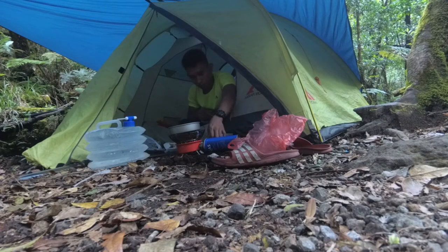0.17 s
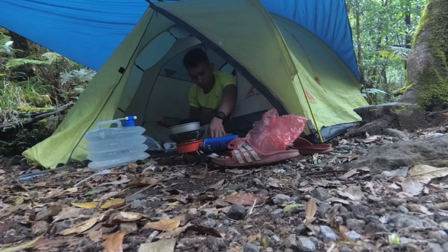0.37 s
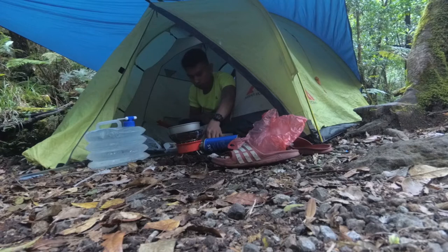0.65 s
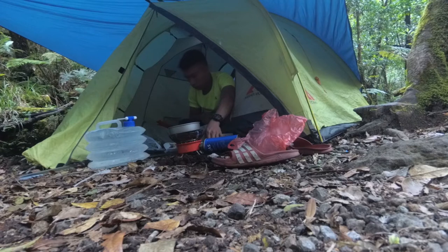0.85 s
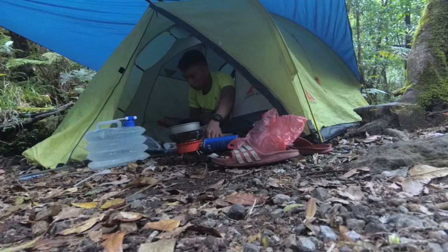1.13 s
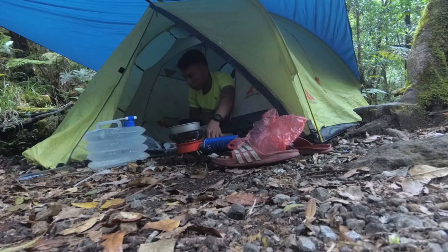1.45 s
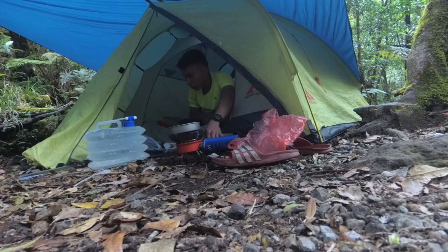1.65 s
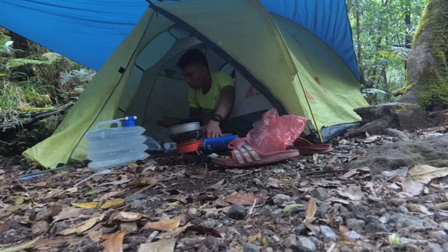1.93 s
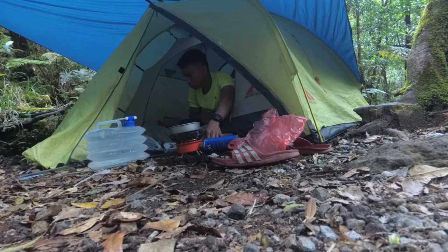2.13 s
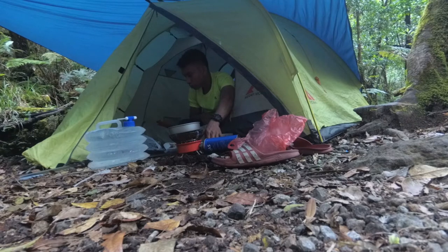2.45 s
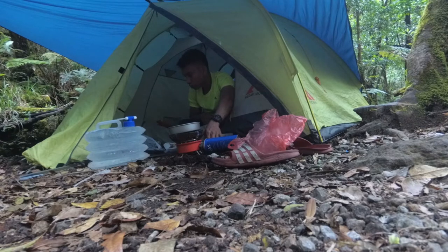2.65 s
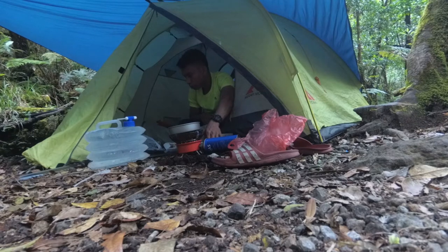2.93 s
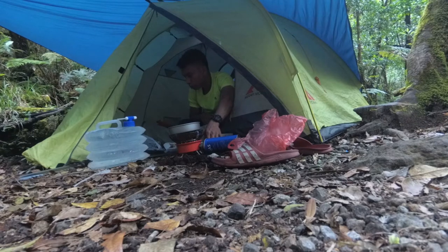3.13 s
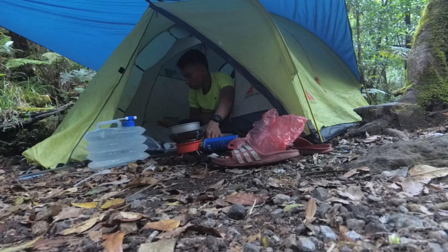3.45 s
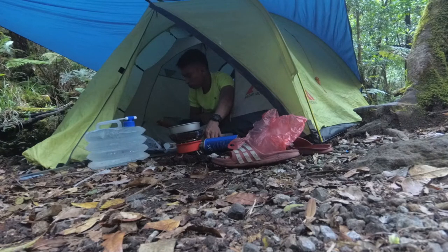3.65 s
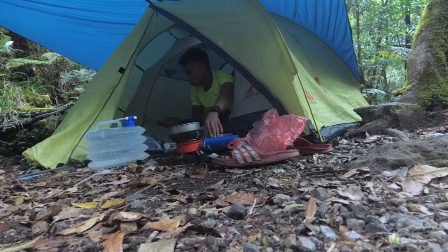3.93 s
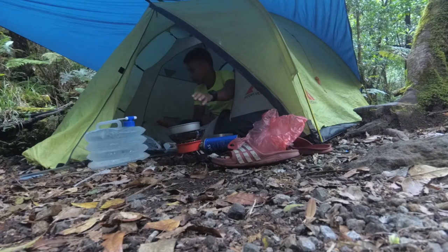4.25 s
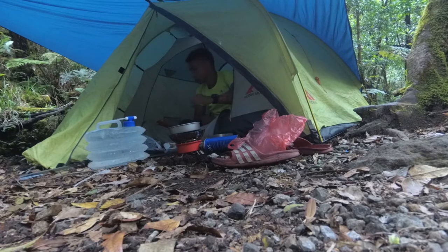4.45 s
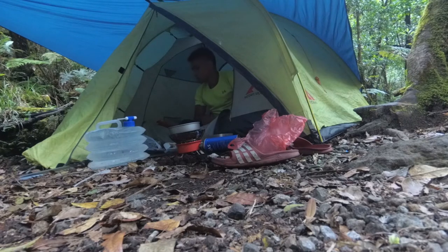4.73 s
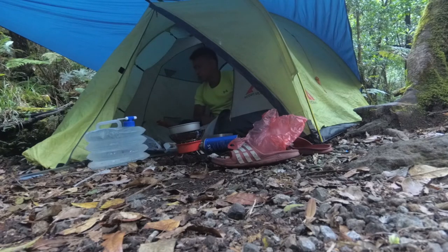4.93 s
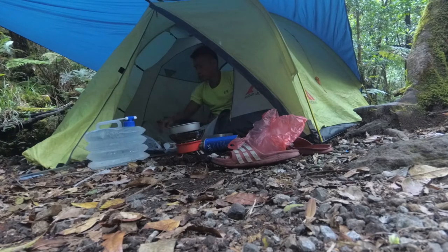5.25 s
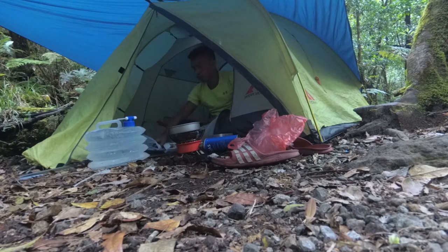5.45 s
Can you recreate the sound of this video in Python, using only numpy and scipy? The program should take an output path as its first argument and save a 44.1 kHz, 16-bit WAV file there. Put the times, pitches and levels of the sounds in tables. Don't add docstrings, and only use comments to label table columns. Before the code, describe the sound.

At a forest campsite, a hollow metal pot is set on a small burner and rocks, then a hard lid blow clangs and rattles, overloading the small microphone about two metres away. Lighter stand knocks and handle taps follow, then a second clattering set-down, a latch-like snap and a metal cup put down. Steady low rumble and faint hiss lie underneath.

```python
import sys
import numpy as np
from scipy import signal
from scipy.fft import rfft, irfft
from scipy.io import wavfile

SR = 44100
rng = np.random.default_rng(int(sys.argv[2]) if len(sys.argv) > 2 else 0)


def decibels_to_gain(level_db):
    exponent = np.asarray(level_db, float) / 20
    return 10 ** exponent


def dump_mix(stems):
    frames = np.atleast_2d(stems).T
    limited = np.clip(frames, -1, 1)
    pcm = np.round(limited * 32767).astype(np.int16)
    wavfile.write(sys.argv[1], SR, pcm)


N = 246519


def in_samples(s):
    return int(round(s * SR))


def rms_one(x):
    return x / np.sqrt(np.mean(x ** 2) + 1e-20)


def peak_one(x):
    return x / np.max(np.abs(x))


def dying(t60, seconds):
    return decibels_to_gain(-60 * np.arange(in_samples(seconds)) / SR / max(t60, 1e-3))


def add(out, s, piece):
    part = out[in_samples(s):in_samples(s) + len(piece)]
    part += piece[:len(part)]


def ring(force, hz, t60):
    radius = decibels_to_gain(-60 / (max(t60, 1e-3) * SR))
    angle = 2 * np.pi * hz / SR
    return signal.lfilter([0, np.sin(angle)], [1, -2 * radius * np.cos(angle), radius ** 2], force)


def coloured(x, spectrum, tilt_db=0):
    hz = np.maximum(np.arange(len(x) // 2 + 1) * SR / len(x), 1)
    points_hz, points_db = np.array(spectrum).T
    shape_db = np.interp(np.log(hz), np.log(points_hz), points_db)
    return irfft(rfft(x) * decibels_to_gain(shape_db + tilt_db * np.log2(hz / 5000)), len(x))


def knocks():
    # t/s, peak level/dB, thump f/Hz, thump t60/s
    single_knocks = [(0.578, 6, 630, 0.013), (0.604, -6, 701, 0.015), (0.677, -2.5, 654, 0.027),
                     (0.794, -30.5, 619, 0.042), (1.075, -20, 544, 0.025), (1.095, -21, 553, 0.024),
                     (1.112, -27, 550, .03), (1.18, -22, 543, 0.041), (1.346, -14, 626, 0.015),
                     (1.42, -24.5, 554, 0.038), (1.546, -19, 580, 0.016), (1.629, -13, 584, 0.019),
                     (1.967, -23, 570, 0.014), (2.039, -25, 448, 0.068), (2.593, -28.5, 595, 0.019),
                     (3.193, -29, 596, 0.025), (3.256, -10.5, 557, 0.021), (3.285, -14, 600, 0.017),
                     (3.317, -21, 530, 0.021), (3.332, -24, 590, 0.026), (3.351, -32, 557, 0.035),
                     (3.434, -13.5, 608, 0.023), (4.116, -29.5, 339, 0.073), (4.3278, -21.5, 580, 0.0081),
                     (4.347, -11.5, 407, 0.011), (4.363, -17.5, 430, 0.023), (4.68, -28.5, 420, 0.032),
                     (4.691, -20, 349, 0.03)]
    # t/s, peak
    # level/dB, f/Hz, t60/s
    second_voices = [
        (.5778, -11, 558, 0.077),
        (.614, -19.5, 715, 0.045),
        (.686, -15, 650, 0.068),
        (1.3468, -20, 440, 0.017),
        (3.2568, -13.5, 730, 0.026),
        (3.3185, -30, 686, 0.034),
        (4.346, -17, 556, 0.051),
        (4.3465, -15.5, 339, 0.018),
        (1.085, -25, 570, 0.017),
        (4.354, -22, 433, 0.016),
    ]
    # t/s, peak level/dB, side mode f/Hz
    set_downs = [
        (0.4097, 0, 624),
        (2.8207, 0, 462),
    ]
    # level re peak/dB, f/Hz, t60/s
    landing = [
        (0.5, 536.6, 0.036),
        (-11.5, 270, 0.013),
    ]
    rows = single_knocks + second_voices
    for s, peak_db, side_hz in set_downs:
        rows = rows + [(s, peak_db + db, hz, t60) for db, hz, t60 in landing]
        rows = rows + [(s, peak_db - 12.5, side_hz, 0.048)]
    return rows


def pot():
    # f/Hz, level/dB, t60/s
    upper_wall = [(1000, 0, 0.07), (1230, 16, 0.025), (1370, 28, 0.04), (1600, 5, .035), (1960, 3, .03),
                  (2220, 0, .03)]
    shoulder_hz, shoulder_db, shoulder_t60 = 719, -14, 0.063
    thud_hz, thud_db, thud_t60 = 337, -19, 0.013
    linger_db, linger_t60 = -30.5, 0.18
    upper_db = -14.5
    out = np.zeros(N)
    t = np.arange(in_samples(.25)) / SR
    swell = 1 - np.exp(-(t / 0.0021) ** 1.5)
    push = -swell * dying(0.002, .25)
    shoulder = -peak_one(swell * dying(shoulder_t60, .25) * np.sin(2 * np.pi * shoulder_hz * t))
    thud = decibels_to_gain(thud_db) * peak_one(ring(push, thud_hz, thud_t60))
    for s, peak_db, hz, t60 in knocks():
        fade = dying(t60, .25) + decibels_to_gain(linger_db) * dying(linger_t60, .25)
        thump = -peak_one(swell * fade * np.sin(2 * np.pi * hz * t))
        uneven_db = 2.5 * rng.standard_normal(len(upper_wall))
        upper = peak_one(sum(decibels_to_gain(db + e) * ring(push, f, d)
                             for (f, db, d), e in zip(upper_wall, uneven_db)))
        knock = thump + decibels_to_gain(shoulder_db) * shoulder + decibels_to_gain(upper_db) * upper + thud
        add(out, s - .0001, decibels_to_gain(peak_db) * knock)
    return out


def rocking():
    # t/s, peak level/dB, favoured f/Hz
    touches = [(.419, -21, 690), (.433, -12, 537), (.446, -11, 547), (.452, -11, 675), (.462, -7.5, 690),
               (.471, -10.5, 720), (.478, -14, 593), (.489, -18, 600), (.498, -28, 620), (.511, -25, 570),
               (.529, -24, 724), (0.535, -9, 740), (.547, -18, 690), (.555, -23, 690), (.620, -23, 610),
               (.639, -26, 590), (.658, -33, 620), (.720, -30, 650), (2.828, -19, 720), (2.845, -13.5, 545),
               (2.859, -12.5, 660), (2.870, -18, 716), (2.882, -7.5, 587), (2.893, -20, 694),
               (2.900, -17, 640), (2.910, -22, 640), (2.924, -22, 630), (2.931, -25, 560),
               (2.943, -20, 640), (2.9551, -10.5, 670), (2.972, -31, 710), (2.985, -26, 580),
               (3.163, -31, 634), (3.181, -31, 640), (3.206, -30, 640), (3.27, -24, 590), (3.340, -34, 647)]
    # f/Hz, level/dB, t60/s
    wall = [(554, 3.5, 0.05), (634, 4, 0.049), (711.5, 1.5, 0.072)]
    favour_hz = 43
    out = np.zeros(N)
    t = np.arange(in_samples(.25)) / SR
    swell = 1 - np.exp(-t / 0.0019)
    for s, peak_db, favoured_hz in touches:
        rings = sum(decibels_to_gain(db - ((hz - favoured_hz) / favour_hz) ** 2) * dying(t60, .25)
                    * np.sin(2 * np.pi * hz * t) for hz, db, t60 in wall)
        add(out, s, -decibels_to_gain(peak_db) * peak_one(swell * rings))
    return out


def metal(hits, modes, crack_colour):
    out, size = np.zeros(N), in_samples(.3)
    swell = 1 - np.exp(-np.arange(size) / SR / 0.0014)
    for s, peak_db, t60, ring_db, tilt_db in hits:
        crack_noise, chatter_noise = rng.standard_normal((2, size))
        uneven_db = 2.5 * rng.standard_normal(len(modes))
        crack = rms_one(coloured(crack_noise, crack_colour, tilt_db)) * swell * dying(t60, .3)
        chatter = chatter_noise * dying(t60 * 0.5, .3)
        rings = sum(decibels_to_gain(db + e + tilt_db * np.log2(hz / 5000)) * peak_one(ring(chatter, hz, d))
                    for (hz, db, d), e in zip(modes, uneven_db))
        add(out, s - .0003, decibels_to_gain(peak_db) * (decibels_to_gain(-3.5) * crack + decibels_to_gain(ring_db - 11.5) * rings))
    return out


def lid():
    # t/s, peak level/dB, crack t60/s, ring level/dB, tilt/(dB/octave)
    hits = [
        (.5775, 3, 0.037, -4.5, -3.5),
        (.5822, 4, 0.036, -3, 3),
        (.604, -26, 0.033, -5, 7),
        (.611, -25.5, 0.37, -6, 3),
    ]
    # t/s, peak level/dB, crack t60/s, ring level/dB, tilt/(dB/octave)
    rattle = [
        (.590, -16, .02, 0, 4),
        (.597, -25, .02, -4, 0),
        (.619, -29, 0.023, 5, 0),
        (.631, -32, .025, 2, 0),
        (.648, -33, .03, 4, 0),
    ]
    # f/Hz, level/dB, t60/s
    modes = [(1710, -22, 0.06), (1391, -18, 0.11), (2930, -15, 0.09), (3300, -11, 0.07), (3510, -10, 0.046),
             (4076, 0, 0.056), (4298, -4, 0.11), (4490, -12, .1), (5000, -22, .08), (5750, -7, 0.072),
             (6172, -1.5, 0.058), (7800, -14, .045), (7960, -17, 0.076), (9050, -2.5, 0.058),
             (9200, -15, 0.059), (9770, -11, .065), (10700, -9, 0.035), (11100, -18, 0.13),
             (13520, -28, 0.072), (14900, -19, .045), (14700, -16, .05)]
    # f/Hz, density/(dB/Hz)
    crack_colour = [(590, -4), (1150, 10.5), (3200, -3), (4190, 4.5), (5400, -8), (6260, -8), (8540, -10),
                    (9250, -14), (9690, -8.5), (15500, -9.5)]
    return metal(hits, modes, crack_colour) + metal(rattle, modes, crack_colour)


def rim():
    # t/s, peak level/dB, crack t60/s, ring level/dB, tilt/(dB/octave)
    hits = [
        (.6775, -11.5, 0.057, -2, -1),
        (.682, -11, 0.039, -1.5, 2),
    ]
    # f/Hz, level/dB, t60/s
    modes = [(1154, 4, 0.044), (1620, -11, 0.03), (2530, -14, .04), (3510, -8, 0.077), (4600, -8, 0.03),
             (6340, -6, .03), (7640, -11, .05), (9040, -12, .035), (11260, -1, .04), (14800, 1, .03)]
    # f/Hz, density/(dB/Hz)
    crack_colour = [(710, -37), (1200, -2.5), (3080, -14), (3540, -4.5), (4070, -17), (4570, -10.5),
                    (7980, -22), (9080, -13), (15500, -12)]
    return metal(hits, modes, crack_colour)


def burner():
    # t/s, peak level/dB, crack t60/s, ring level/dB, tilt/(dB/octave)
    hits = [
        (.4098, -13, 0.079, -7, 0.15),
        (.4153, -11.5, 0.041, 3, 1),
        (2.8218, -22, 0.021, 14.5, -0.91),
        (2.8265, -10, 0.05, -3.5, -0.1),
        (2.833, -22, 0.059, -7, 1),
    ]
    # f/Hz, level/dB, t60/s
    modes = [(1383, 6, 0.029), (2020, -17, 0.13), (2750, -23, .12), (3850, -6, 0.066), (4830, -5.5, 0.037),
             (6480, -9, 0.056), (7410, -8, 0.044), (10060, -7.5, 0.028), (11900, -6, 0.031),
             (14400, -3.5, .03)]
    # f/Hz, density/(dB/Hz)
    crack_colour = [(1100, 5.5), (1390, 5), (2010, 3), (2330, -7.5), (4760, -4), (5350, -14), (6600, 0.5),
                    (8330, -15), (10800, -2), (15500, -16)]
    return metal(hits, modes, crack_colour)


def prongs():
    # t/s, peak level/dB, crack t60/s, ring level/dB, tilt/(dB/octave)
    rebounds = [
        (.4505, -20.5, 0.073, -1.5, -4.5),
        (.4548, -23, .04, -9, 4),
        (.468, -20.5, 0.11, -12, -6),
        (2.8592, -18, 0.042, 2.5, -5),
        (2.8636, -16, 0.029, -5, 3),
        (2.872, -19.5, 0.056, 1, -5.5),
        (2.885, -32, 0.25, -9, -4),
    ]
    # f/Hz, level/dB, t60/s
    prong_modes = [(1830, -7, 0.037), (2030, -10, 0.08), (2710, -24, .14), (3350, -11, .05),
                   (4500, 4.5, 0.049), (4750, -3, .045), (7040, -2, .04), (11500, -6, .03),
                   (14500, -2, .03)]
    # t/s, peak level/dB, crack t60/s, ring level/dB, tilt/(dB/octave)
    tine_hits = [
        (.424, -34, 0.026, 13.5, -2),
        (.452, -32.5, .02, 16, -3.5),
        (2.832, -31.5, 0.015, 12.5, -5),
        (2.866, -16, 0.016, 15, 9),
        (2.958, -35, 0.013, 13, 2),
    ]
    # f/Hz, level/dB, t60/s
    tine_modes = [(2035, -1.5, 0.13), (2526, -11, 0.15), (3078, -17, 0.1)]
    # t/s, peak level/dB, crack t60/s, ring level/dB, tilt/(dB/octave)
    grit_hits = [
        (.424, -29, .04, -2, -2),
        (.434, -29, .04, -4, -8),
        (.462, -27, .04, -2, -2),
        (.478, -31, .04, -2, -5),
        (.490, -34, .05, -2, -2),
        (2.843, -32, .04, 1, -6),
        (2.878, -28, .04, 0, -1),
        (2.895, -34, .05, -2, -2),
        (2.9565, -22.5, 0.021, 3, -2),
    ]
    # f/Hz, level/dB, t60/s
    grit_modes = [(985, -8, .03), (1090, -1, .04), (1380, 2, .06), (1800, -5, .04), (3304, -3, .06),
                  (3840, -6, .05), (4415, -8, .06), (5100, -7, .05)]
    # f/Hz, density/(dB/Hz)
    crack_colour = [(710, -28), (1200, -2), (2030, -15), (2360, -17), (2510, -6), (3980, -5), (4530, -18),
                    (5670, -9), (7170, -13), (15500, -7)]
    pairs = [(rebounds, prong_modes), (tine_hits, tine_modes), (grit_hits, grit_modes)]
    return sum(metal(hits, modes, crack_colour) for hits, modes in pairs)


def stand():
    # t/s, peak level/dB, crack t60/s, ring level/dB, tilt/(dB/octave)
    hits = [(.536, -20.5, 0.081, -6, -5.5), (1.077, -29, 0.077, 1, -5), (1.090, -29, 0.03, 4, -3),
            (1.969, -32.5, 0.029, 3.5, -1.5), (2.9565, -15, 0.032, -8, -4), (2.965, -27, 0.043, -7, 2),
            (3.2566, -16, 0.054, 8, -2.5), (3.2612, -14.5, 0.029, -5, 3), (3.285, -14, 0.019, 2.5, 1),
            (3.2897, -16, 0.033, 0, 4.5), (3.318, -26, 0.04, -8, -9), (3.333, -29, 0.029, -13, -3.5)]
    # f/Hz, level/dB, t60/s
    modes = [(990, -35, 0.027), (1319, 0, 0.033), (1620, -19, 0.018), (2100, -22, .035), (2450, -24, 0.028),
             (3400, -18, 0.04), (3870, -12, 0.03), (7500, -7.5, 0.016), (10300, -10, .02)]
    # t/s, peak level/dB, crack t60/s, ring level/dB, tilt/(dB/octave)
    foot_hits = [
        (1.0755, -34, .02, 2, -0.5),
        (1.084, -31, .025, 4, -3),
        (1.096, -36, .02, 3, -1.5),
        (1.966, -39, 0.018, 3, -4),
        (3.291, -31, 0.023, 6, -1),
        (3.3205, -37, .03, 4, -4),
        (3.332, -33, .025, 3, 1),
    ]
    # f/Hz, level/dB, t60/s
    foot_modes = [(860, 4, .025), (1180, -14, 0.027), (1320, 8, .035), (1490, 3, .03), (1760, -6, .035),
                  (2600, -13, .03), (3150, -2, .03)]
    # f/Hz, density/(dB/Hz)
    crack_colour = [(590, -32), (1150, 1), (1290, -12), (2390, -14), (4760, -11.5), (5460, -22),
                    (8340, -25), (10300, -22.5), (14100, -34), (15500, -30)]
    return metal(hits, modes, crack_colour) + metal(foot_hits, foot_modes, crack_colour)


def handle():
    # t/s, peak level/dB, crack t60/s, ring level/dB, tilt/(dB/octave)
    hits = [
        (1.3465, -10.5, 0.023, -5, 0.5),
        (1.351, -7, 0.03, -1.5, 0),
        (1.365, -35, 0.12, -6, 10),
        (1.404, -25.5, 0.046, -4, 2),
        (1.546, -19.5, 0.046, -2, 1),
        (1.551, -23, 0.057, -17, -3.5),
        (1.800, -35, .03, -3, 11.5),
    ]
    # f/Hz, level/dB, t60/s
    modes = [(1380, -3, 0.043), (2200, -12, 0.054), (3550, -8, 0.026), (3820, -9, 0.02),
             (4770, -3.5, 0.029), (6320, -2.5, 0.028), (7870, -3, 0.034), (10180, -1, 0.023),
             (10300, -4, .018), (12000, -25.5, .02), (14000, -12, .02)]
    # t/s, peak level/dB, crack t60/s, ring level/dB, tilt/(dB/octave)
    latch_hits = [
        (3.4332, -15, 0.023, 2.5, 2),
        (3.438, -13, 0.042, 0, 2.5),
    ]
    # f/Hz, level/dB, t60/s
    latch_modes = [(1456, 2.5, 0.023), (3860, 0.5, 0.031), (4830, -9, .035), (6580, -1, 0.03),
                   (7450, -1.5, .03), (10340, 1, 0.023), (12200, -8, .025)]
    # f/Hz, density/(dB/Hz)
    crack_colour = [(740, -49), (1250, -8.5), (3090, -4), (3820, -0.5), (5460, -7), (7730, -5.5),
                    (9450, -13.5), (10300, -9.5), (14600, -8), (15500, -9.5)]
    return metal(hits, modes, crack_colour) + metal(latch_hits, latch_modes, crack_colour)


def cup():
    # t/s, peak level/dB, crack t60/s, ring level/dB, tilt/(dB/octave)
    hits = [
        (4.347, -16, 0.073, -1.5, -1.3),
        (4.352, -14, 0.047, -1.5, 1.4),
        (4.692, -26, 0.04, -2.3, -0.97),
    ]
    # f/Hz, level/dB, t60/s
    modes = [(1349, 0, 0.11), (2535, -8, 0.09), (2604, -7, 0.11), (3040, 2, 0.059), (3290, -5, 0.1),
             (3512, -10, 0.07), (3900, -18, 0.12), (4410, -6, 0.091), (5040, -9, 0.12), (6370, -6, 0.07),
             (7420, -13, 0.17), (8000, -11, 0.1)]
    # f/Hz, density/(dB/Hz)
    crack_colour = [(590, -12), (1000, -11.5), (1360, -1), (2340, -16), (2590, -9), (2810, -10), (3410, -3),
                    (5780, -17), (9910, -16), (15500, -26)]
    return metal(hits, modes, crack_colour)


def pings():
    # t/s, peak level/dB, f/Hz, t60/s
    partials = [(.420, -30, 2030, .09), (.455, -31, 2030, .1), (.412, -25, 3080, .06),
                (.454, -29, 1391, .08), (.580, -12, 4090, 0.12), (.582, -15, 4298, 0.09),
                (.584, -16, 6172, .06), (.583, -18, 9040, .05), (0.582, -11, 985, .04),
                (1.352, -25, 2207, .05), (1.551, -33, 2880, .05), (2.828, -25, 4830, .045),
                (2.832, -22, 2035, 0.12), (2.823, -32, 3850, .08), (2.866, -28.5, 2526, .17),
                (2.874, -28, 4500, .04), (2.957, -29, 3870, .03), (2.957, -24, 985, .03),
                (2.962, -32, 3400, .04), (3.256, -23, 4830, .05), (3.262, -31, 2160, .04),
                (3.292, -28, 3080, .06), (3.437, -27, 3860, 0.044)]
    out = np.zeros(N)
    t = np.arange(in_samples(.25)) / SR
    swell = 1 - np.exp(-t / .002)
    for s, peak_db, hz, t60 in partials:
        add(out, s, decibels_to_gain(peak_db) * swell * dying(t60, .25) * np.sin(2 * np.pi * hz * t))
    return out


def surroundings(x):
    echo_db, echo_t60, delay_s = -15.5, .14, .008
    tail = rng.standard_normal(in_samples(.4)) * dying(echo_t60, .4)
    tail = signal.sosfilt(signal.butter(2, [1500, 6600], "band", fs=SR, output="sos"), tail)
    tail = tail / np.sqrt(np.sum(tail ** 2))
    tail = np.concatenate([np.zeros(in_samples(delay_s)), tail])
    return decibels_to_gain(echo_db) * signal.fftconvolve(x, tail)[:N]


def forest():
    # f/Hz, density/(dB/Hz)
    forest_colour = [(15, -64), (25, -34), (96, -16), (119, -9), (169, -3.5), (216, -2.5), (253, -2),
                     (360, -6.5), (584, -11), (633, -11.5), (785, -15.5), (1420, -20), (13600, -27),
                     (15600, -22)]
    stir_s, stir_db, stir_width_s = 0.64, 1.4, 0.19
    t = np.arange(N) / SR
    level_db = -36 + stir_db * np.exp(-((t - stir_s) / stir_width_s) ** 2)
    hiss = rms_one(coloured(rng.standard_normal(N), forest_colour))
    hiss = signal.sosfilt(signal.cheby2(14, 45, 15550, fs=SR, output="sos"), hiss)
    return decibels_to_gain(level_db) * hiss


def scene():
    cookware = pot() + rocking() + pings()
    cookware += lid() + rim() + burner() + prongs() + stand() + handle() + cup()
    cookware = signal.sosfilt(signal.butter(2, 210, "high", fs=SR, output="sos"), cookware)
    return (cookware + surroundings(cookware) + forest())[None]


def top_cut(x):
    return signal.sosfilt(signal.butter(12, 15770, fs=SR, output="sos"), x)


def record(dry):
    cut = signal.sosfilt(signal.cheby2(14, 40, 15850, fs=SR, output="sos"), dry)
    return top_cut(np.clip(cut, -1, 1))


dry = scene()
out = record(dry)
dump_mix(out)
```